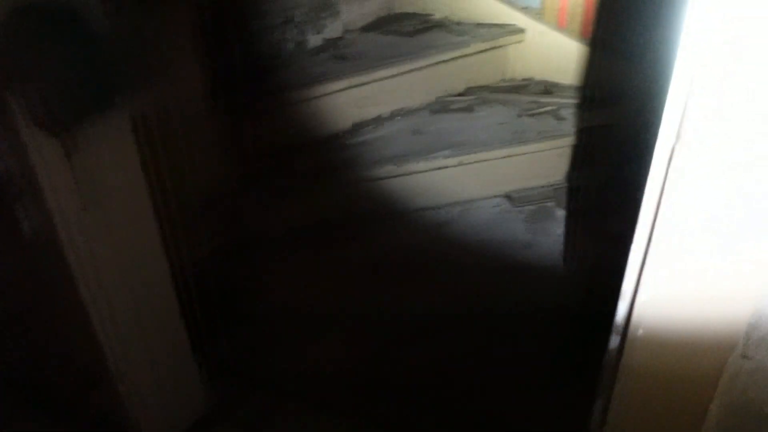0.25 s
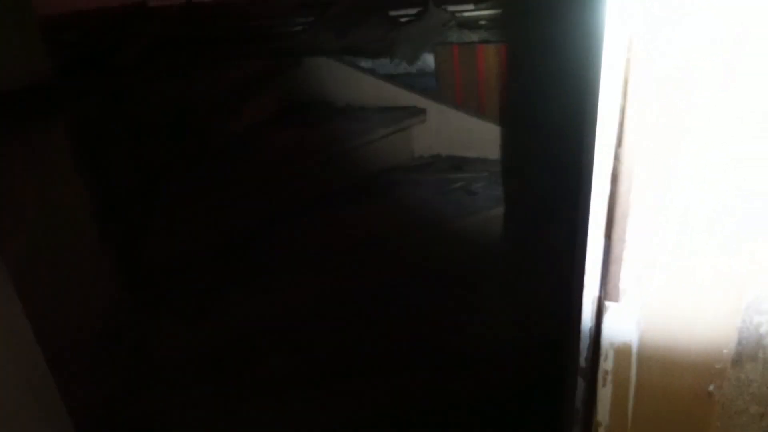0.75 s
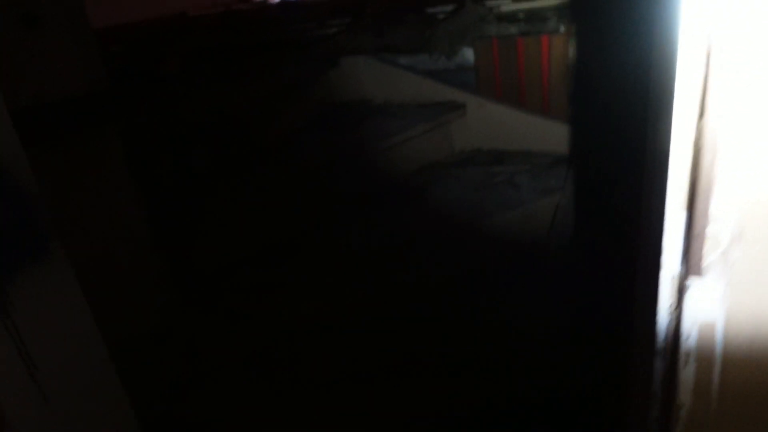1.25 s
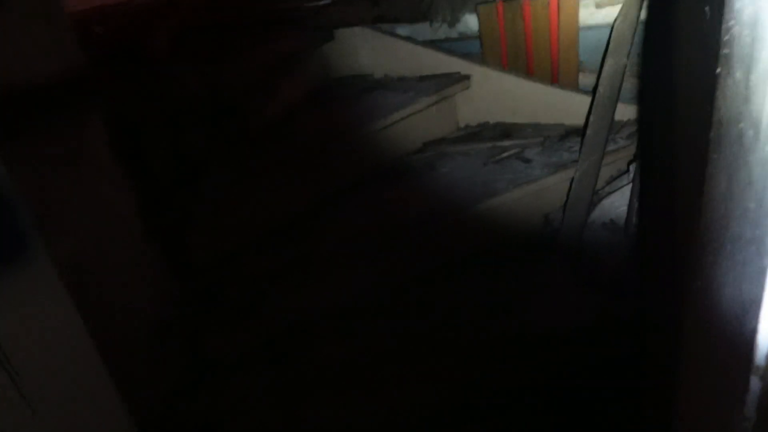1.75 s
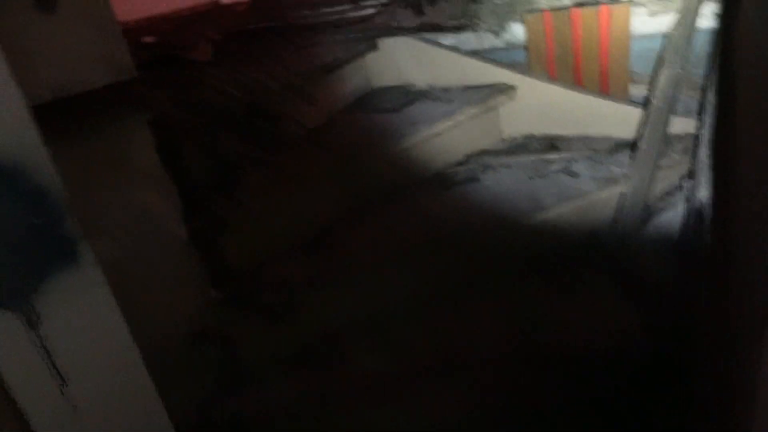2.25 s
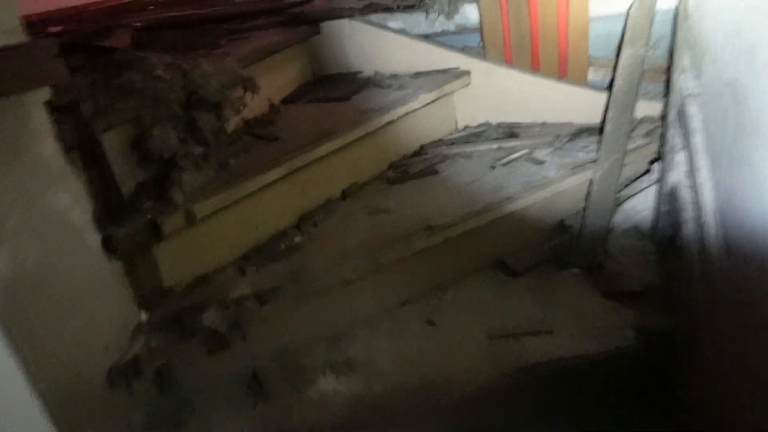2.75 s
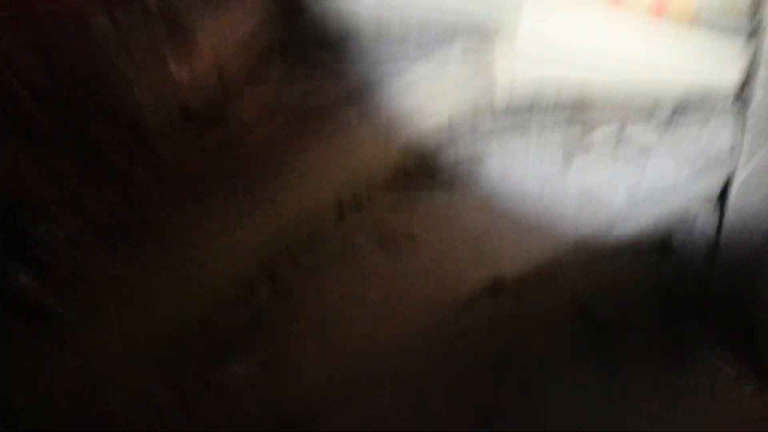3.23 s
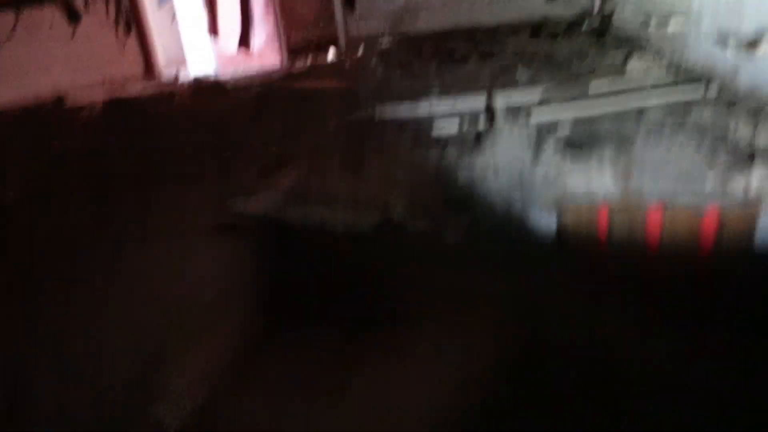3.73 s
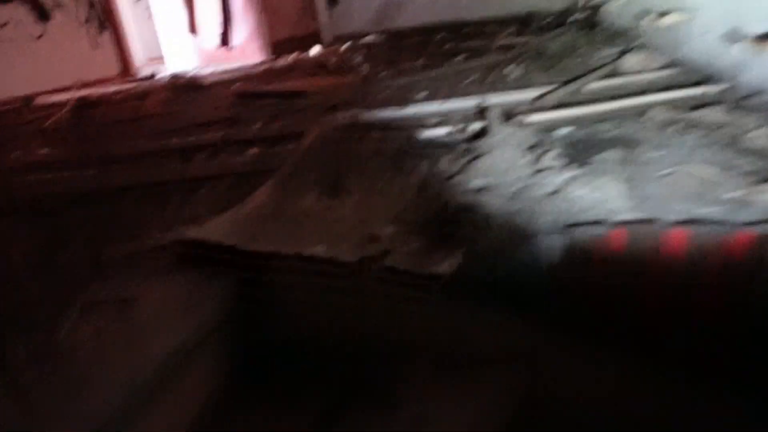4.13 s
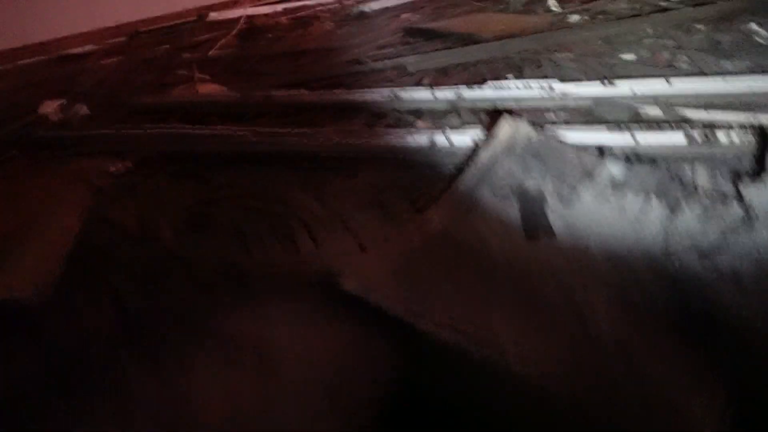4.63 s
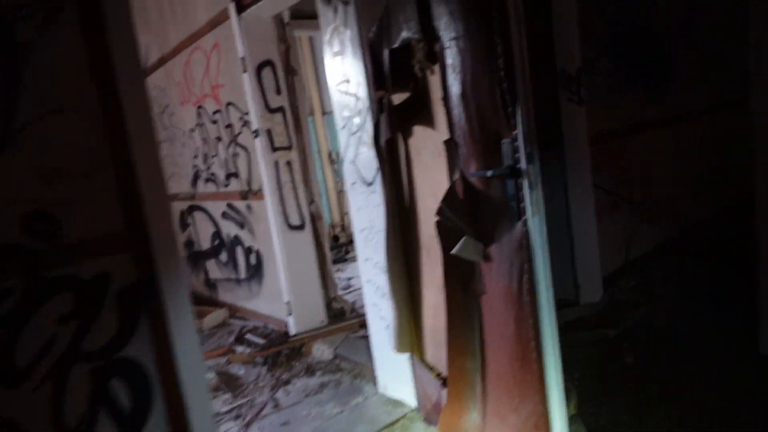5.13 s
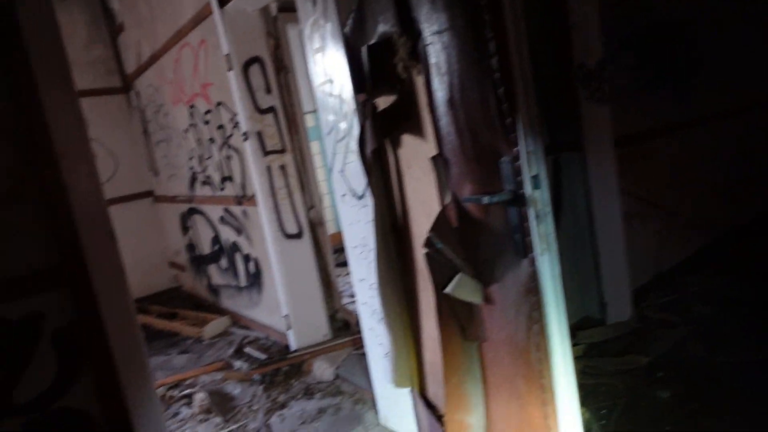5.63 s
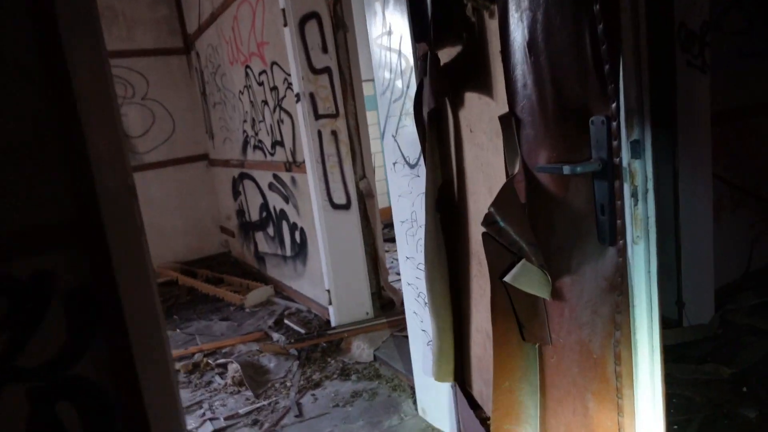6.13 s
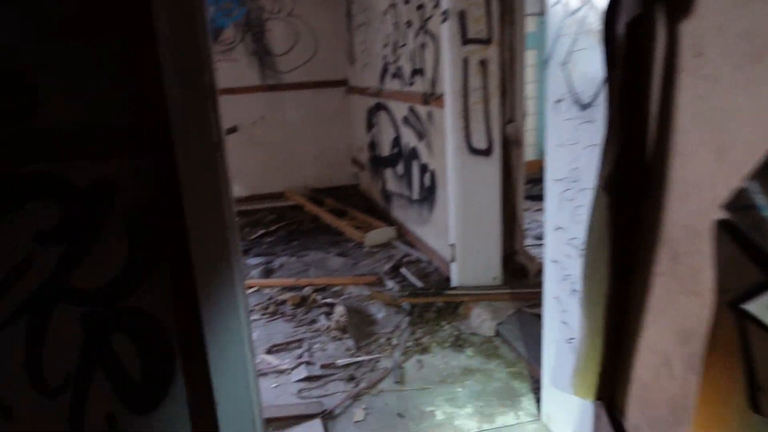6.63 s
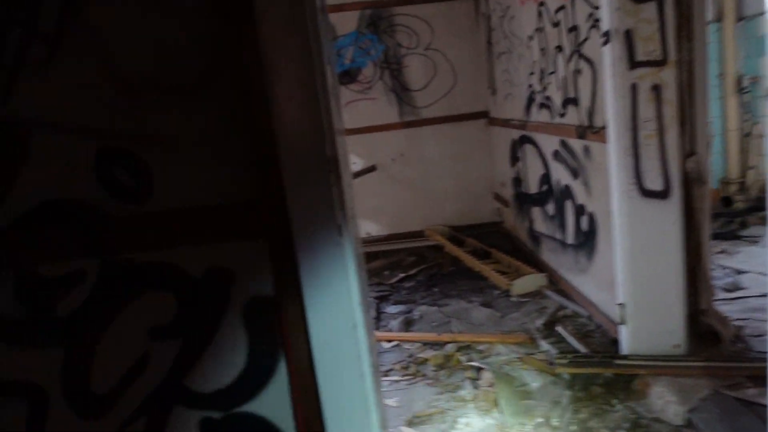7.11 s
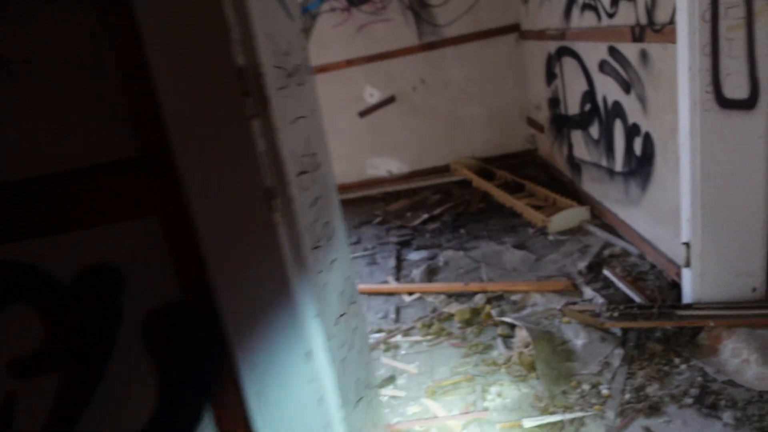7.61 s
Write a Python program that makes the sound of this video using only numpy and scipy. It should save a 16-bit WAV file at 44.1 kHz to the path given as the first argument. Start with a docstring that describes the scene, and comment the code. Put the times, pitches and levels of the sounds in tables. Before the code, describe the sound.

Someone picks a way over rubble inside a derelict house, held microphone close. A heel thuds and snaps a splinter, then sparse faint clicks and soft cloth rustle. Heavier steps come around three seconds, a sleeve brushes and air bumps the microphone. A brittle shard cracks sharply near five seconds, grit slides, a piece tumbles away, and a board scrapes before one last sharp click.

```python
"""A splinter snaps under a thudding heel as someone picks a way over rubble through the bare rooms of a
derelict house: filtered noise bursts and damped low cycles, reflected by the walls. Grit crunches as clouds
of grains, clothes rustle by friction, and air buffets the microphone ports in the walker's hand on a quick
turn. A brittle shard cracks and rings in its modes, a loose piece tumbles away over the grit as a train of
small crunches, then a shoe scrapes a resonant board along the floor."""
import sys
import numpy as np
from scipy import signal
from scipy.fft import rfft, irfft, next_fast_len
from scipy.io import wavfile

SR = 44100
rng = np.random.default_rng(int(sys.argv[2]) if len(sys.argv) > 2 else 0)


def unload_wav(signal):
    """Save mono or channel-first audio to the path in sys.argv[1] as 16-bit WAV at rate SR, clipped to [-1, 1]."""
    wavfile.write(
        sys.argv[1],
        SR,
        np.round(np.clip(np.atleast_2d(signal).T, -1, 1) * 32767).astype(np.int16),
    )


N = 346751
TIME = np.arange(N) / SR   # s
EFFORT_REFERENCE_DB = -35

# correlation of left and right at closely spaced ports: [f/Hz, coefficient]
LIKENESS = [(60, .7), (220, .96), (900, .94), (2000, .87), (5000, .79), (15000, .8)]
# weight landing on the floor: [t/s, level/dB, pitch f/Hz]
THUDS = [(.007, -20.5, 320), (.009, -30, 191.3), (.437, -30.5, 205), (1.376, -44, 303.8), (1.405, -43, 140),
         (2.146, -49, 227.7), (2.402, -23, 564.2), (2.417, -25, 218), (2.967, -22.5, 148.6),
         (3.071, -14, 201), (3.076, -27.5, 93), (3.084, -23, 474.4), (3.13, -22, 402.1), (4.092, -26, 140),
         (5.317, -25.5, 179), (6.575, -41, 279.2), (7.284, -39, 285)]
# strength of the grit sliding, swelling as the shard breaks and then fading, as effort: [t/s, level/dB]
SLIDE = [(4.9, -43.5), (5.05, -29), (5.158, -23.5), (5.344, -19.5), (5.886, -28.5), (6.06, -33.5),
         (6.29, -34)]
# the clothes rustle again around the last step, as effort: [t/s, level/dB]
LAST_RUSTLE = [(7.1, -52), (7.464, -41), (7.67, -44), (7.86, -44.5)]


def from_db(db):
    """Level to amplitude: 20 dB is a factor of ten."""
    return 10 ** (np.asarray(db) / 20)


def rms_one(x):
    """Normalisation to unit root-mean-square amplitude."""
    return x / np.sqrt(np.mean(x ** 2) + 1e-20)


def at_hz(points, hz):
    """Interpolation of a spectrum on a logarithmic frequency axis."""
    f, value = np.array(points)[:, 0], np.array(points)[:, 1]
    return np.interp(np.log(hz + 1), np.log(f), value)


def filtered(x, gain):
    """Linear filtering: the spectrum is multiplied by a gain that is a function of frequency."""
    size = next_fast_len(x.shape[-1])
    hz = np.fft.rfftfreq(size, 1 / SR) + 1   # kept off zero for the logarithms
    return irfft(rfft(x, size) * gain(hz), size)[..., :x.shape[-1]]


def low_cut(x, edge_hz):
    """Second-order high-pass: the bass falls away below an edge."""
    return signal.sosfilt(signal.butter(2, edge_hz, "high", fs=SR, output="sos"), x)


def hump(centre_hz, octaves):
    """Heavy damping: an irregular piece has one broad resonance, at half amplitude this far from its centre."""
    return lambda hz: 1 / (1 + (np.log2(hz / centre_hz) / octaves) ** 2)


def resonances(modes, hz):
    """Modal superposition: damped modes [f/Hz, width/Hz, level/dB] stand out of a flat response."""
    return 1 + sum(from_db(db) / (1 + 2j * (hz - f) / width) for f, width, db in modes)


def add(out, s, sound):
    """Superposition: a sound is mixed in from time s on."""
    start = max(round(s * SR), 0)
    out[..., start:start + sound.shape[-1]] += sound[..., :N - start]


def blow(sound, db):
    """Impulsive energy: a short sound gets the energy of 5 ms at this level."""
    energy = np.sum(np.atleast_2d(sound) ** 2, axis=1).mean()
    return from_db(db) * sound / np.sqrt(energy / (.005 * SR))


def stereo(pair, likeness=LIKENESS):
    """Partial coherence: two unrelated signals, as sum and difference, become left and right."""
    mid = filtered(pair[0], lambda hz: np.sqrt(1 + at_hz(likeness, hz)))
    side = filtered(pair[1], lambda hz: np.sqrt(1 - at_hz(likeness, hz)))
    return np.array([mid + side, mid - side])


def noise_burst(t):
    """White noise, equally strong at all frequencies, as left and right."""
    return stereo(rng.standard_normal((2, len(t))))


def grains(size, per_s, spread_db, hiss_db, likeness=LIKENESS):
    """Shot noise: tiny fractures of very uneven size at random instants, over a smooth hiss of dust."""
    born = rng.random(size) < per_s / SR
    sizes = from_db(spread_db * np.minimum(rng.exponential(1, size), 4))
    signs = rng.choice([-1, 1], (2, size))
    clicks = rms_one(born * sizes * signs)
    hiss = from_db(hiss_db) * rng.standard_normal((2, size))
    return stereo(clicks + hiss, likeness)


def flutter(rate):
    """Low-pass noise: slow random wandering of unit rms, at half amplitude at this rate in Hz."""
    return rms_one(filtered(rng.standard_normal(N), lambda hz: 1 / (1 + (hz / rate) ** 2)))


def effort(curve):
    """Movement as a level in dB over time, sinking to nothing within 0.15 s outside its curve."""
    s, db = np.transpose(curve)
    return np.interp(TIME, [s[0] - .15, *s, s[-1] + .15], [-110, *db, -110])


def room_response(early_db, early_s, gap_s):
    """Reverberation: dense early reflections off near walls, then a tail that dies first in the top treble."""
    # reverberation time of bare walls: [f/Hz, t60/s]
    wall_t60 = [(150, 0.6365), (400, 0.34), (1500, 0.38), (5000, 0.4244), (10000, 0.44), (16000, 0.072)]
    t = TIME[:SR // 2]
    noise, tail = noise_burst(t), 0
    for k, (_, t60) in enumerate(wall_t60):
        share = [(row[0], j == k) for j, row in enumerate(wall_t60)]   # overlapping bands that sum to one
        tail = tail + filtered(noise, lambda hz: at_hz(share, hz)) * from_db(-60 * t / t60)
    early = 1 + from_db(early_db) * np.exp(-t / early_s)
    onset = np.minimum(t / gap_s, 1) ** 2
    out = tail * early * onset
    return out / np.sqrt(np.sum(out ** 2) / 2)   # mean energy per channel 1


def in_room(sound, rooms, wet_db):
    """Convolution with an impulse response drawn by chance: each spot on the floor meets other reflections."""
    room = rooms[rng.integers(len(rooms))]
    mono = sound.mean(axis=0, keepdims=True)
    out = from_db(wet_db) * signal.fftconvolve(mono, room, axes=1)
    out[:, :sound.shape[1]] += sound
    return out


def shuffle(effort_db, level_db, follows, boom_db, diffuse_db, side_db):
    """Structure-borne rumble: it follows movement and booms after thuds, diffuse when faint, central when strong."""
    # spectrum of the rumble: [f/Hz, relative level/dB]
    rumble_colour = [(25, -36), (50, -18), (100, -16.5), (150, -7), (195, -2), (300, -2), (420, -6.5),
                     (600, -11.5), (1000, -47.5)]
    boom_s = .17   # fall of the boom to 1/e
    noise = rng.standard_normal((2, N))
    mid, side = rms_one(filtered(noise, lambda hz: from_db(at_hz(rumble_colour, hz))))
    moving = from_db(level_db + follows * (effort_db - EFFORT_REFERENCE_DB))
    booms = [from_db(db + boom_db) * (TIME > s) * np.exp(-np.abs(TIME - s) / boom_s) for s, db, _ in THUDS]
    level = np.sqrt(moving ** 2 + sum(boom ** 2 for boom in booms))   # powers add
    spread = np.minimum(level, from_db(diffuse_db)) * from_db(side_db)
    return mid * level + side * spread * [[1], [-1]]


def buffets(left_db):
    """Turbulent pressure: eddies hit each port separately, the left one harder."""
    # air pushing on the ports: [t/s of the peak, level/dB, Gaussian spread/s]
    puff_rows = [(4.256, -21, 0.016), (4.408, -22, 0.009327), (4.625, -25.5, 0.017), (4.657, -24, 0.004994),
                 (4.692, -30.5, .012), (4.742, -31, 0.010666)]
    push = sum(from_db(db) * np.exp(-.5 * ((TIME - s) / spread) ** 2) for s, db, spread in puff_rows)
    noise = rng.standard_normal((2, N))
    eddies = filtered(noise, lambda hz: hump(100, .9)(hz) / (1 + (hz / 230) ** 4))
    return rms_one(eddies) * push * from_db([[left_db], [-left_db]])


def rubbing(effort_db, source, colour, bands, modes=()):
    """Friction noise: surface-coloured grains, one effort setting body, grit and sizzle, fluttering slightly."""
    source = filtered(source, lambda hz: from_db(at_hz(colour, hz)) * resonances(modes, hz))
    out, above_reference = 0, effort_db - EFFORT_REFERENCE_DB
    for (db, follows), (low, high) in zip(bands, [(380, 3000), (3000, 9000), (9000, 20000)]):   # Hz
        band = filtered(source, lambda hz: 1 / (1 + (low / hz) ** 6) / (1 + (hz / high) ** 8))
        out = out + rms_one(band) * from_db(EFFORT_REFERENCE_DB + db + follows * above_reference)
    return out * from_db(.5 * flutter(16.67))


def clothes(walking_db, cloth):
    """Friction of fabric: the rustle grows with the vigour of the walk."""
    # spectrum of the rustle: [f/Hz, relative level/dB]
    rustle_colour = [(400, -9), (700, 4), (1000, 0.5), (1350, 3.5), (1650, 5.5), (2100, 1.5), (3000, -1.5),
                     (6000, -5.5), (9000, -11.5), (16000, -15.5)]
    # body, grit, sizzle: [level against the effort at its reference/dB, slope/dB per dB of effort]
    rustle_bands = [(-6.5, 0.81), (-1.5, 1.28), (-3.5, 1.22)]
    return rubbing(walking_db, cloth, rustle_colour, rustle_bands)


def sleeve(brushing_db, cloth):
    """Friction of fabric close by: a sleeve brushes past during the turn."""
    # spectrum of the brushing: [f/Hz, relative level/dB]
    brush_colour = [(400, 4.5), (800, -1.5), (1300, 1), (1900, 2), (3000, -1), (6000, -4), (10000, -9),
                    (13000, -6.5), (14400, -5.5), (16000, -8)]
    # body, grit, sizzle: [level against the effort at its reference/dB, slope/dB per dB of effort]
    brush_bands = [(-3.5, 0.83), (-2.5, 1), (-1, 0.6351)]
    return rubbing(brushing_db, cloth, brush_colour, brush_bands)


def drag(sliding_db, grit):
    """Granular friction: loose grit slides over the floor."""
    # spectrum of the slide: [f/Hz, relative level/dB]
    slide_colour = [(400, -8), (700, -3), (1500, -0.5), (3200, -4), (4600, -7), (5600, -4), (8000, -9),
                    (10000, -16), (16000, -19.5)]
    # body, grit, sizzle: [level against the effort at its reference/dB, slope/dB per dB of effort]
    slide_bands = [(-5, 0.79), (-2.5, 0.9446), (-11.5, 0.99)]
    return rubbing(sliding_db, grit, slide_colour, slide_bands)


def chips(sliding_db, count):
    """Random impacts: chips click in the sliding grit, each at its own pitch, their level following the slide."""
    level_db, scatter_db = -5, 2.5   # mean and standard deviation, against the slide
    low_hz, high_hz, octaves, decay_s = 1900, 7550, .1404, .00262
    first_s, last_s = SLIDE[0][0], LAST_RUSTLE[0][0]
    out, t = np.zeros((2, N)), TIME[:1024]
    for when, pitch in rng.random((count, 2)):
        s = first_s + when * (last_s - first_s)
        colour = hump(low_hz * (high_hz / low_hz) ** pitch, octaves)
        click = filtered(noise_burst(t), colour) * np.exp(-t / decay_s)
        db = np.interp(s, TIME, sliding_db) + level_db + scatter_db * rng.standard_normal()
        add(out, s, blow(click, db))
    return out


def shoving(bite_db, release_db_per_s):
    """Stick and slip as a level in dB: a shove takes hold quickly, bites for a moment, holds and lets go."""
    # a shoe shoves the board: [t/s, level/dB, hold/s]
    shove_rows = [(6.308, -22.5, 0.037), (6.463, -17, 0.082)]
    attack_db_per_s, bite_s = 1800, .041
    levels = []
    for s, db, hold in shove_rows:
        early, late = np.maximum(s - TIME, 0), np.maximum(TIME - s, 0)
        attack = attack_db_per_s * early
        bite = bite_db * np.exp(-late / bite_s)
        release = release_db_per_s * np.maximum(late - hold, 0)
        levels.append(db - attack + bite - release)
    return np.maximum(np.max(levels, axis=0), -120)


def scrape(pushing_db, grit):
    """Friction-driven resonance: grit under the shoved board excites the board's modes."""
    # spectrum of the scrape: [f/Hz, relative level/dB]
    scrape_colour = [(400, -5), (650, -5.5), (1200, -8.5), (1800, -3.5), (2400, -6), (3900, -1.5),
                     (6400, -7), (11000, -8), (16000, -18)]
    # body, grit, sizzle: [level against the effort at its reference/dB, slope/dB per dB of effort]
    scrape_bands = [(-2, 0.92), (-8.5, 0.56), (-3.5, 0.36)]
    # modes of the board: [f/Hz, width/Hz, level/dB]
    board_modes = [(1380, 286.4, 18), (1580.8, 110, 3), (3001.3, 162.4, -2.5), (3736.4, 270, 6)]
    return rubbing(pushing_db, grit, scrape_colour, scrape_bands, modes=board_modes)


def squeaks(rooms, room_db, octaves):
    """Frictional excitation: a chafing edge drives one narrow resonance of its piece."""
    # pieces that ring or squeak briefly: [t/s, level/dB, f/Hz, decay to 1/e/s]
    squeak_rows = [(3.547, -22, 2097, .0054), (4.933, -30.5, 1380, 0.014), (6.601, -31, 1683, 0.0652),
                   (6.706, -30, 4275, 0.046), (7.29, -26.5, 1720, 0.0097), (7.315, -36, 3350, .06),
                   (7.456, -40.5, 5050, 0.0385)]
    out, t = np.zeros((2, N)), TIME[:SR // 4]
    for s, db, pitch_hz, decay in squeak_rows:
        tone = rms_one(filtered(noise_burst(t), hump(pitch_hz, octaves)))
        add(out, s, in_room(from_db(db) * tone * np.exp(-t / decay), rooms, room_db))
    return out


def shard(rooms, room_db, run_s):
    """Crack propagation: at each flex a stream of tiny fractures rings the modes of the shard."""
    # bending of the shard: [t/s, level/dB]
    flex_rows = [(4.982, -11), (4.990, -16), (5.01, -15.5), (5.026, -15), (5.038, -14.5), (5.055, -14)]
    # modes of the shard: [f/Hz, width/Hz, level/dB]
    shard_modes = [(3390, 90, 14), (6710, 200, 12), (7760, 170, 17), (8670, 200, 8), (9030, 160, 8),
                   (12850, 400, 4), (14100, 400, 1), (14890, 250, 7), (15560, 250, 11)]
    out, t = np.zeros((2, N)), TIME[:SR // 6]
    for s, db in flex_rows:
        fractures = grains(len(t), per_s=4600, spread_db=3.5, hiss_db=-2) * np.exp(-t / run_s)
        ring = filtered(fractures, lambda hz: hump(13000, 1.6)(hz) * resonances(shard_modes, hz))
        add(out, s, in_room(blow(ring, db), rooms, room_db))
    return out


def crush(rows, rooms, room_db):
    """Granular fracture: a cloud of grains swells and ebbs as the load passes over it."""
    out = np.zeros((2, N))
    for s, db, centre_hz, octaves, spread in rows:
        t = np.arange(-3 * spread, 3 * spread, 1 / SR)
        cloud = grains(len(t), per_s=3000, spread_db=3.8, hiss_db=-5)
        cloud = rms_one(filtered(cloud, hump(centre_hz, octaves)))
        cloud = from_db(db) * cloud * np.exp(-.5 * (t / spread) ** 2)
        add(out, s + t[0], in_room(cloud, rooms, room_db))
    return out


def tumble(rooms, room_db, count):
    """Geometric series of impacts: each turn comes sooner and duller, fading while two faces land unequally."""
    start_s, first_turn_s, shrink = 5.408, .0695, .986
    first_db, loss_db, lopsided_db = -13, 1.16, .5   # loss per turn
    first_hz, dulling, octaves, spread_s = 5481, .04, .65, .007   # dulling as log frequency per turn
    turn = np.arange(count)
    times = start_s + first_turn_s * (1 - shrink ** turn) / (1 - shrink)
    rows = []
    for k, s in enumerate(times):
        db = first_db - loss_db * k + lopsided_db * (-1) ** k
        rows.append((s, db, first_hz * np.exp(-dulling * k), octaves, spread_s))
    return crush(rows, rooms, room_db)


def crunches(rooms, room_db):
    """Granular fracture: grit is crushed under a sole as weight rolls over it, and the loose piece crunches on
    a few turns before and after its regular run."""
    # crushed grit, and the tumbling piece's crunches outside its regular run: [t/s of the peak, level/dB,
    # centre f/Hz, half-width/octaves, Gaussian spread/s]
    crunch_rows = [(.095, -36.5, 1313, 1.2, .015), (.965, -40.5, 400, 4.6, 0.021),
                   (1.575, -38.5, 1100, 3.46, 0.01), (2.422, -23.5, 400, 3.2, .011),
                   (3.1, -32, 800, 5.7, 0.03928), (4.311, -28, 1620, .55, .005),
                   (4.583, -34.5, 2072, 2.967, .01), (4.838, -26, 1800, 5, 0.010616),
                   (4.94, -30, 3550, 1.282, 0.018), (5.094, -12.5, 6100, 0.63, 0.0033874),
                   (5.175, -13.5, 6400, 1, .015), (5.229, -14.5, 4750, 1.157, .017),
                   (5.318, -14, 3300, 2.4, 0.01363), (5.444, -19.5, 2100, 1.024, .006),
                   (6.025, -26.5, 2380, 1.2, 0.019), (6.32, -20.5, 6000, 5.5, 0.012435),
                   (6.482, -16, 2300, 1.367, .01), (6.588, -9.5, 9200, 0.65, .004),
                   (6.722, -27.5, 3500, 0.72, 0.021), (6.835, -23.5, 6000, 6.3, 0.009696),
                   (7.273, -27.5, 12000, 1.285, .004), (7.286, -26, 2470, 2.3, 0.013),
                   (7.316, -23.5, 4516, 1.6, 0.005559), (7.465, -35.5, 4516, 0.29, 0.0097),
                   (7.585, -35, 2120, 0.95, 0.02118), (7.81, -44, 781.6, 1, .025)]
    return crush(crunch_rows, rooms, room_db)


def snaps(rooms, room_db):
    """Brittle fracture: a burst dies within milliseconds, and the room mixes its radiation into an even tail."""
    # splinters and plaster: [t/s, level/dB, centre f/Hz, half-width/octaves, room level/dB]
    snap_rows = [(.007, -14.5, 480, 1.8, -1), (.16, -30.5, 1400, 1.3593, 2), (.309, -29.5, 2570, 3.5, 1),
                 (.54, -38, 2747, 2.143, 4), (1.002, -37.5, 4900, 4, 5), (1.462, -43, 8330, 1.5, 6),
                 (1.506, -34.5, 650, 2.5, 0), (1.683, -23.5, 1200, 2.76, 0),
                 (2.311, -36.5, 8933, 0.51, 4.5), (2.405, -25, 537, 2.6, -1), (2.967, -15.5, 1576, 1.17, 0),
                 (3.079, -19.5, 1423, 0.67, 2), (3.129, -19.5, 1000, 1, 3), (3.547, -16, 1740, 1.2, 0.5),
                 (3.571, -21, 1754, 1.55, 0.5), (3.655, -25, 1578, 1.1, -6),
                 (3.682, -22, 1489, 0.74, -11.5), (4.089, -22.5, 2050, .5, -3.5),
                 (4.135, -27, 2076, .55, 1), (4.281, -21, 3100, 1, -2), (4.326, -24, 1900, 1.34, -5),
                 (4.411, -29.5, 1813, 1.643, -5), (4.788, -31.5, 12000, .5, -16),
                 (4.821, -23.5, 1100, 2.2, 1), (4.982, -10.5, 15000, 1.1, -15),
                 (5.079, -8.5, 4070, 2.2, -2.5), (5.152, -13, 2800, 0.97, -4),
                 (5.166, -11.5, 1800, 1.4, -13), (5.294, -18, 1592, 0.63, -9),
                 (5.317, -12.5, 920, 1.4, -12), (6.469, -9, 2000, 2.15, 3.5),
                 (6.577, -8.5, 1520, 2.5, -10.5), (7.282, -11.5, 14900, 0.54, -10)]
    decay_s, crumbling = .0019, .65   # fall to 1/e at one octave; broader snaps crumble longer by this power
    out, t = np.zeros((2, N)), TIME[:2048]
    for k, (s, db, centre_hz, octaves, wet_db) in enumerate(snap_rows):
        colour, decay = hump(centre_hz, octaves), decay_s * octaves ** crumbling
        burst = filtered(noise_burst(t), colour) * np.exp(-t / decay)
        tail = filtered(rooms[k % len(rooms)], colour)
        add(out, s, blow(burst, db))
        add(out, s + decay / 2, blow(tail, db + room_db + wet_db))
    return out


def thuds(rooms, slap_db, rise_s, room_db):
    """Damped oscillation: the floor gives way in a few low cycles, with a dull slap of the sole."""
    decay_cycles = 2   # fall to 1/e
    out, t = np.zeros((2, N)), TIME[:8192]
    for s, db, pitch_hz in THUDS:
        slap = rms_one(filtered(noise_burst(t), hump(pitch_hz, .79)))
        cycles = np.sin(2 * np.pi * pitch_hz * t)
        envelope = np.exp(-t * pitch_hz / decay_cycles) * (1 - np.exp(-t / rise_s))
        thud = (cycles + from_db(slap_db) * slap) * envelope
        add(out, s, in_room(blow(thud, db), rooms, room_db))
    return out


def scene():
    """Superposition of rubbing, breaking debris and floor rumble, heard from the walker's hand."""
    # vigour of the walk, as effort: [t/s, level/dB]
    walk_curve = [(0.0, -46), (0.24, -46), (0.66, -49), (0.91, -48), (1.03, -45), (1.28, -50.5),
                  (1.66, -47.5), (1.79, -50.5), (1.89, -54), (2.24, -53), (2.36, -45), (2.49, -45.5),
                  (2.73, -37.5), (2.82, -39), (3.1, -29), (3.26, -35.5), (3.5, -38.5)]
    # the sleeve brushing close by, as effort: [t/s, level/dB]
    sleeve_curve = [(3.5, -39), (3.702, -32.5), (3.854, -39), (4.13, -41.5), (4.38, -38.5), (4.68, -40.5),
                    (4.868, -43.5), (4.9, -38)]
    # correlation of left and right in diffuse sound: [f/Hz, coefficient]
    diffuse = [(400, .67), (2000, .72), (15000, .76)]
    creep_db, trickle_db, fade_db_per_s = -13.5, -7.5, 35   # board and grit moving on after a shove
    rooms = [room_response(early_db=2.0, early_s=.025, gap_s=.005) for _ in range(16)]
    cloth = grains(N, per_s=3000, spread_db=2.5, hiss_db=5.5, likeness=diffuse)
    grit = grains(N, per_s=3000, spread_db=3.3, hiss_db=0)

    walking = np.maximum(effort(walk_curve), effort(LAST_RUSTLE))
    brushing = effort(sleeve_curve)
    coasting = shoving(0, fade_db_per_s)
    sliding = np.maximum(effort(SLIDE), trickle_db + coasting)
    pushing = np.maximum(shoving(bite_db=6.5, release_db_per_s=132), creep_db + coasting)
    movement = np.max([walking, brushing, sliding], axis=0)

    low = shuffle(movement, level_db=-51.0, follows=.43, boom_db=-19.5, diffuse_db=-53.0, side_db=-6.5)
    low = low + buffets(left_db=3.5) + thuds(rooms, slap_db=-2.5, rise_s=.0018, room_db=-2.5)
    fabric = clothes(walking, cloth) + sleeve(brushing, cloth)
    friction = drag(sliding, grit) + scrape(pushing, grit)
    debris = chips(sliding, count=110) + squeaks(rooms, room_db=-2.5, octaves=.05)
    debris = debris + shard(rooms, room_db=-1.0, run_s=.008025) + tumble(rooms, room_db=-7, count=9)
    debris = debris + crunches(rooms, room_db=-4.5) + snaps(rooms, room_db=0)
    debris = low_cut(debris, edge_hz=189.33)   # small pieces radiate little bass
    return fabric + low + (debris + friction) * from_db([[-.3], [.3]])   # slightly to the right


def record(dry):
    """Saturation and band limits: peaks are rounded near full scale, deep bass is shed, the top is cut."""
    cutoff_hz = 15800
    x = dry / (1 + (dry / .92) ** 4) ** .25
    x = low_cut(x, edge_hz=75)
    return signal.sosfilt(signal.ellip(12, .1, 70, cutoff_hz, fs=SR, output="sos"), x)


dry = scene()
out = record(dry)
unload_wav(out)
```